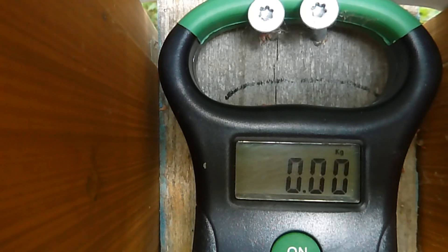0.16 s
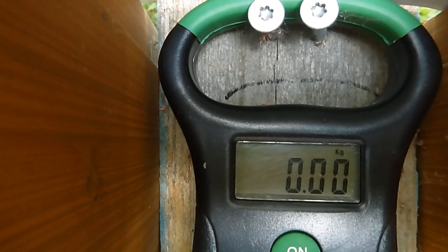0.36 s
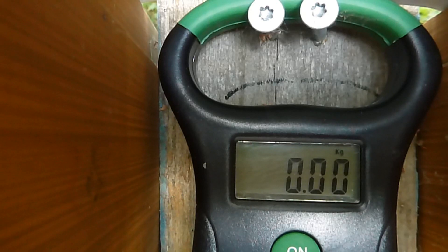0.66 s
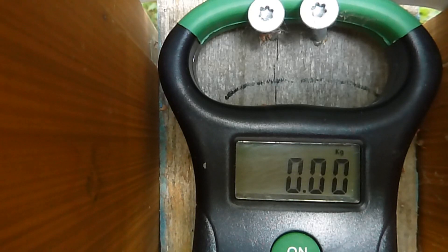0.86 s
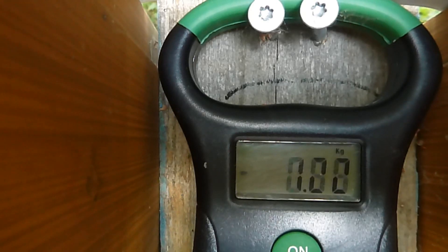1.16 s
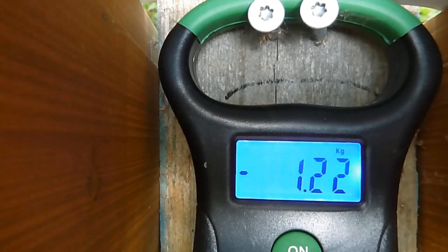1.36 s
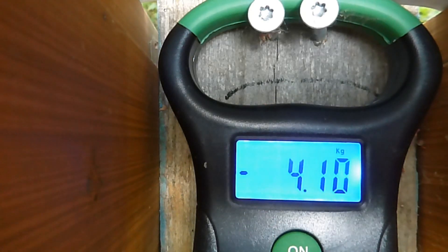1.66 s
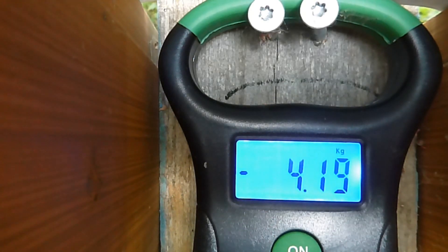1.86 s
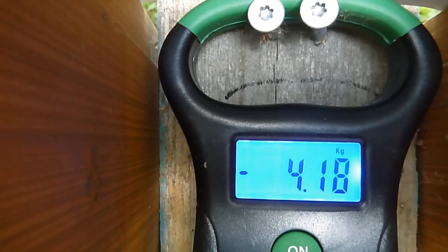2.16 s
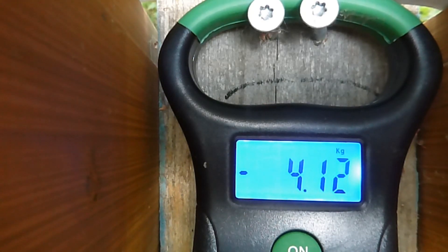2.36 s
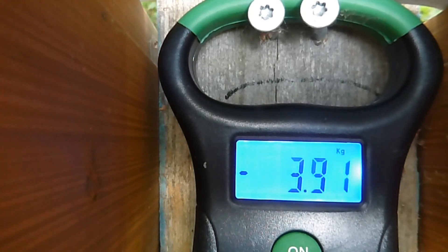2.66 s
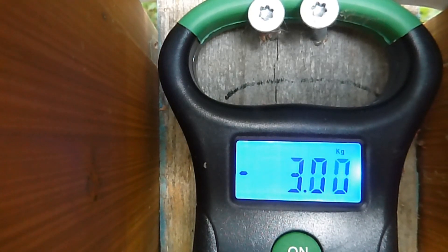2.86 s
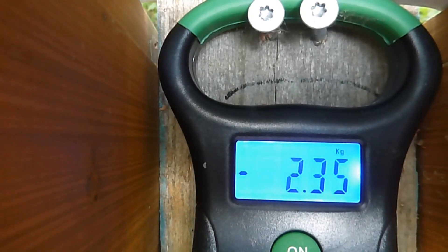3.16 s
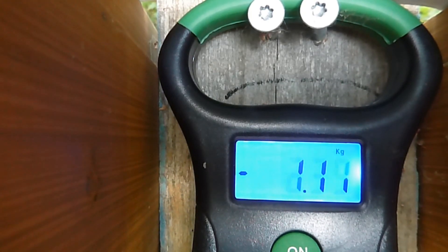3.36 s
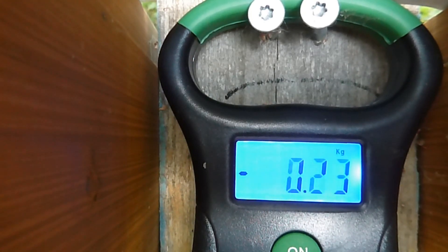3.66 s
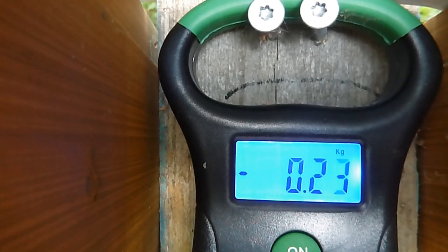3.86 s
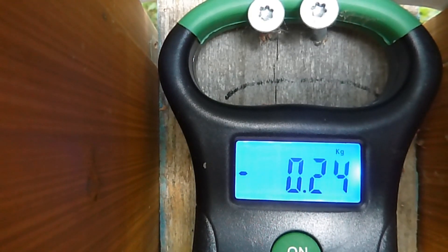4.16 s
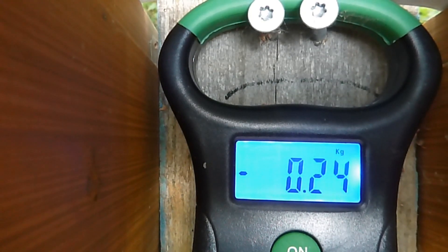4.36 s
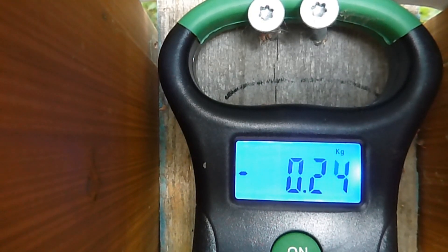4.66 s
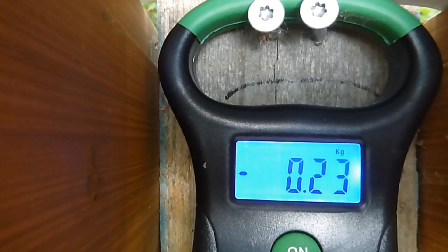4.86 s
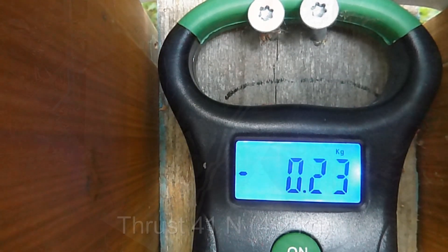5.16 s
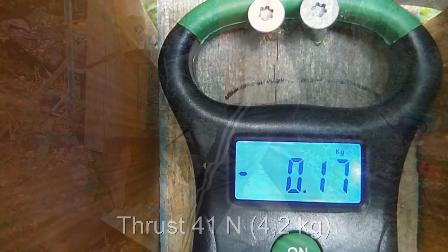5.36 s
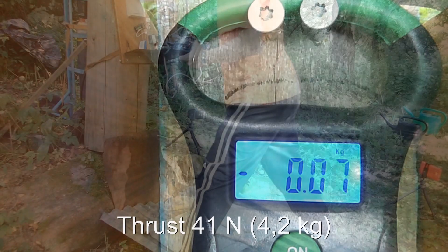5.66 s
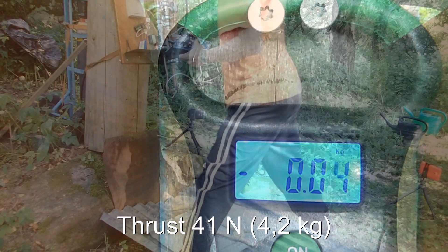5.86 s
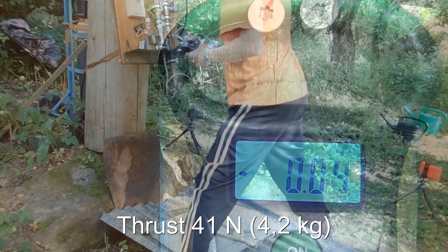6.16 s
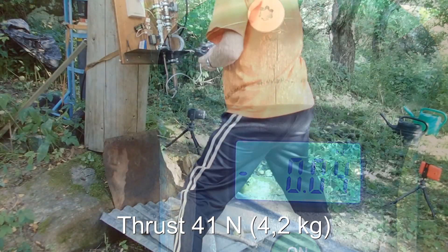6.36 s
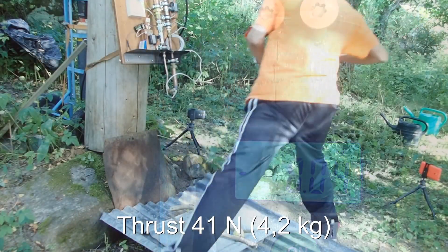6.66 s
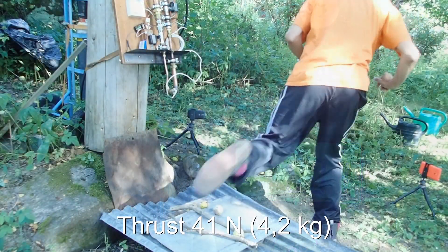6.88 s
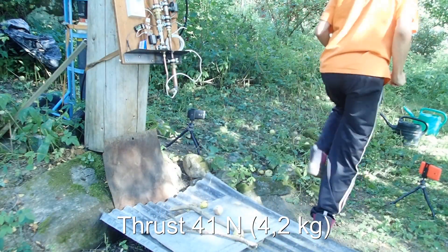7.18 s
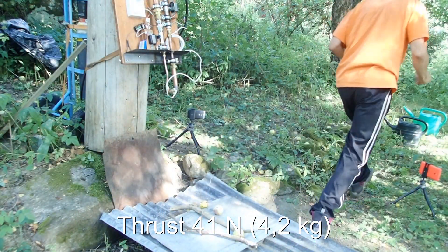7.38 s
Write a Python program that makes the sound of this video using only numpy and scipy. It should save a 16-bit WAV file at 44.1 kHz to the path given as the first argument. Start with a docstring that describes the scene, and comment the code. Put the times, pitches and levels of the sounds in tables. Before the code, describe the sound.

Outdoor test stand, microphone near the motor, dry sound. A full gritty roar sags slightly and breaks off in cracks; a fraying, jumping whistle and strong hiss follow, then gusty sputters and a throaty rush. Suddenly the level drops to airy hiss through a hollow tube, with a low blown-bottle hum that swells once. It cuts out with a flutter and gulp. Faint insects surround the listener, with a scrape underfoot and one hard step clanking thin metal.

```python
"""A small solid-fuel rocket motor burns close by on an outdoor stand, starting with a roar of shaped noise.
Slag pops (short pressure swings), a screech (gliding, fraying tones) joins, and the flame sputters in gusts.
Thrust then drops to a hollow hiss through case resonances, with a blown-bottle hum, and dies with a low gulp.
A quiet garden of high insect hiss and soft air (more noise) fades in, where someone runs off:
a scuff of gritty noise, then a hard footfall that sets off the ringing tones of a metal sheet."""
import sys
import numpy as np
from scipy import signal
from scipy.fft import rfft, irfft
from scipy.io import wavfile
from scipy.ndimage import uniform_filter1d

SR = 44100
rng = np.random.default_rng(int(sys.argv[2]) if len(sys.argv) > 2 else 0)


def output_pcm(signal):
    """Save a mono or channel-first signal as 16-bit PCM at the path in sys.argv[1].

    Samples are clipped to [-1, 1] before scaling.
    """
    pcm = np.clip(np.atleast_2d(signal).T, -1, 1) * 32767
    wavfile.write(sys.argv[1], SR, np.round(pcm).astype(np.int16))


N = 331587
TIME = np.arange(N) / SR  # seconds
HZ = np.fft.rfftfreq(N, 1 / SR)
# thrust collapses at burnout; the last fuel is gone at EMPTY_S
BURNOUT_S, COLLAPSE_S, EMPTY_S = 3.22, 0.019, 5.315


def amp(db):
    """Turns decibels into a gain."""
    return 10 ** (np.asarray(db) / 20)


def unit(x):
    """Scales a signal to rms 1."""
    return x / np.sqrt(np.mean(x ** 2) + 1e-20)


def colour(points):
    """Gain of a spectrum whose points are joined on a log-frequency axis."""
    hz, db = np.transpose(points)
    return amp(np.interp(np.log(HZ + 1), np.log(hz + 1), db))


def bumps(modes):
    """Gain of resonances (positive dB) or notches (negative dB) on a flat base."""
    return amp(sum(db / (1 + (2 * (HZ - hz) / width) ** 2) for hz, width, db in modes))


def peak(hz, width):
    """Gain of one resonance that lets only its own pitch region through."""
    return 1 / (1 + (2 * (HZ - hz) / width) ** 2)


def resonances(modes):
    """Gain of several separate resonances."""
    return sum(amp(db) * peak(hz, width) for hz, width, db in modes)


def wander(rate_hz):
    """Smooth random drift of rms 1, mostly slower than the given rate."""
    return unit(irfft(rfft(rng.standard_normal(N)) / (1 + (HZ / rate_hz) ** 4), N))


def turbulence(gain, band, width, gust_db=0, gust_hz=100):
    """Moving air: mid and side noise in gusts, then coloured; the mid has rms 1 inside the band."""
    gusts = amp(gust_db * wander(gust_hz))
    spectrum = rfft(rng.standard_normal((2, N)) * gusts) * gain
    spectrum[1] *= width
    inside = (HZ > band[0]) & (HZ < band[1])
    return irfft(spectrum, N) / np.std(irfft(spectrum[0] * inside, N))


def scatter(share, decay):
    """Gain of the direct path plus reflections; only short waves bounce off the stand's small parts."""
    spray = rng.standard_normal(N) * np.exp(-TIME / decay)
    short_waves = HZ ** 2 / (HZ ** 2 + 2500 ** 2)
    return abs(1 + share * short_waves * rfft(spray) / np.linalg.norm(spray))


def ahead(x, side_db):
    """Mid and side of a source in front, with a little scattered sound from the sides."""
    spray = rng.standard_normal(N) * np.exp(-TIME / 0.004)
    scattered = irfft(rfft(x) * rfft(spray), N) / np.linalg.norm(spray)
    return np.array([x, amp(side_db) * scattered])


def held(end, release):
    """Full until the end, then an exponential release."""
    return np.exp(-np.maximum(TIME - end, 0) / release)


def envelope(start, rise, end, release):
    """Straight attack, hold until the end, exponential release."""
    return np.clip((TIME - start) / rise, 0, 1) * held(end, release)


def burst(start, rise, decay):
    """An attack that starts to die away as soon as it is full."""
    return envelope(start, rise, start + rise, decay)


PUFF_RISE_S = 0.0051


def puffs(rows):
    """Gain over time of a series of short puffs of gas."""
    return sum(amp(db) * burst(s, PUFF_RISE_S, decay) for s, db, decay in rows)


# tone colour of the insect chorus: f/Hz, level/dB
INSECT_COLOUR = [(2500, -46), (3600, -22), (4600, -10), (6200, -3), (7700, -6.5), (9200, -4),
                 (10200, -15.5), (15000, -20)]
# tone colour of the outdoor air: f/Hz, level/dB
AIR_COLOUR = [(20, -5), (60, 1), (150, 1), (400, -1), (1000, -4.5), (1600, -7), (2200, -16.5),
              (3200, -20.5), (8000, -27)]
# how widely the garden spreads around the listener: f/Hz, side level/dB
GARDEN_SPREAD = [(30, 1), (300, -6), (1500, -6.5), (5000, -6.5), (10000, 2)]
GARDEN_START_S, GARDEN_RISE_S = 5.31, 1.57
INSECTS_DB, AIR_DB, AIR_EARLY_SHARE = -59.7, -63, 0.32  # the air is faintly there all along


def garden():
    """A far chorus of insects, blended into a steady hiss, over soft outdoor air."""
    width = colour(GARDEN_SPREAD)
    insects = turbulence(colour(INSECT_COLOUR), (5000, 9500), width, gust_db=0.0, gust_hz=60)
    air = turbulence(colour(AIR_COLOUR), (100, 1500), width, gust_db=-1.1, gust_hz=12)
    fade_in = np.clip((TIME - GARDEN_START_S) / GARDEN_RISE_S, 0, 1)
    air_strength = AIR_EARLY_SHARE + (1 - AIR_EARLY_SHARE) * fade_in
    return amp(INSECTS_DB) * insects * fade_in + amp(AIR_DB) * air * air_strength


# feet on dry ground: t/s, level/dB, rise/s, decay/s
STEPS = [(6.735, -49, 0.041, 0.052), (6.811, -51.5, .008, .018), (7.25, -53.5, .003, 0.2)]
# tone colour of grit and dry leaves underfoot: f/Hz, level/dB
GRIT_COLOUR = [(60, -16), (330, 6), (700, -1.5), (1300, 7.5), (1900, -2), (2600, -19), (6000, 2),
               (9000, -4), (11000, -18), (15000, -20)]


def footsteps():
    """Soles scrape over grit and dry leaves: rough noise that swells with each press of the foot."""
    press = sum(amp(db) * burst(s, rise, decay) for s, db, rise, decay in STEPS)
    return press * turbulence(colour(GRIT_COLOUR), (50, 15000), amp(-9), gust_db=-1.5, gust_hz=400)


# heel, sole and rebound knock the sheet: t/s, level/dB
SHEET_KNOCKS = [(7.2499, -42), (7.259, -49), (7.266, -50)]
# tone colour of the clatter: f/Hz, level/dB
CLATTER_COLOUR = [(100, -22.5), (450, -13), (800, 2), (1700, 5), (2100, -25), (5000, -34)]
# ringing tones of the metal sheet: f/Hz, level/dB, time to fall by 60 dB/s
SHEET_MODES = [(540, -61.5, .4), (804, -51, .07), (972, -53.5, 0.38), (1140, -53.5, 0.64), (1390, -58, .5),
               (1560, -47, 0.47), (1650, -55, 0.77)]


def sheet():
    """Heel and sole knock a metal sheet: a short clatter, then its wavering modes ring on."""
    clatter = turbulence(colour(CLATTER_COLOUR), (400, 2000), amp(-12))
    blows = sum(amp(db) * (TIME > s) * np.exp(-abs(TIME - s) / 0.005) for s, db in SHEET_KNOCKS)
    t = np.maximum(TIME - SHEET_KNOCKS[0][0], 0)
    ring = np.zeros(N)
    for hz, db, t60 in SHEET_MODES:
        phase = 2 * np.pi * hz * t + 0.777 * wander(52)
        ring += amp(db - 60 * t / t60) * np.sin(phase)
    return clatter * blows + ahead(ring * np.minimum(t / 0.0028, 1), side_db=-9.5)


# cancellations heard beside the stand, used for most motor sounds: f/Hz, width/Hz, level/dB
NOTCHES = [(1285, 39, -13), (1914, 60, -22), (2410, 160, -18)]
# tone colour of the guttering flame: f/Hz, level/dB
FLUTTER_COLOUR = [(30, -25), (100, -30), (160, -12), (260, -8), (380, -1), (520, -2.5), (800, -7.5),
                  (1100, -14), (2500, -26), (6000, -40)]
# the flame gutters as it goes out: t/s, level/dB, decay/s
GUTTERS = [(5.19, -42, 0.06), (5.295, -40.5, 0.089), (5.465, -65, 0.016)]
# resonances of the empty case: f/Hz, width/Hz, level/dB
SINGING_MODES = [(397, 43, 8.5), (647, 81, 1), (2000, 82, 3), (2140, 110, -2), (3490, 220, -7),
                 (5100, 120, -7), (8600, 200, -13), (13650, 220, -11), (14830, 250, -8)]
SINGING_SPELL, SINGING_DB = (5.25, 0.15, 5.6, 0.16), -61  # start, rise, end, release in s
LAST_GULP = (5.44, 0.022, 0.022)  # start, rise, decay in s
LAST_GULP_HZ, LAST_GULP_WIDTH_HZ, LAST_GULP_DB = 163, 50, -48.5


def flameout():
    """The flame flutters and goes out with a low gulp, and the last gas sings in the case."""
    flutter = turbulence(colour(FLUTTER_COLOUR), (100, 900), amp(-42), gust_db=1.5, gust_hz=80)
    gulp = turbulence(peak(LAST_GULP_HZ, LAST_GULP_WIDTH_HZ), (100, 300), amp(-24))
    case = resonances(SINGING_MODES) * bumps(NOTCHES)
    singing = turbulence(case, (200, 15500), amp(-29), gust_db=3.0, gust_hz=30)
    flutter = flutter * puffs(GUTTERS)
    gulp = amp(LAST_GULP_DB) * gulp * burst(*LAST_GULP)
    singing = amp(SINGING_DB) * singing * envelope(*SINGING_SPELL)
    return flutter + gulp + singing


HUM_HZ, HUM_WIDTH_HZ, HUM_DB, HUM_SIDE_DB = 374, 36.5, -46, -28
HUM_SPELL = (3.26, 0.26, 5.45, 0.04)  # start, rise, end, release in s
HUM_STEADY = 0.45  # 0 leaves the swells alone, higher evens them out
# one flare-up; its level is that of the extra hum, added to the hum already there
SURGE_S, SURGE_RISE_S, SURGE_DECAY_S, SURGE_EXTRA_DB = 4.4, 0.077, 0.15, 6.5


def hum():
    """The case sounds like a blown bottle; the oscillation partly steadies itself and flares up once."""
    air = turbulence(peak(HUM_HZ, HUM_WIDTH_HZ), (250, 500), amp(HUM_SIDE_DB))
    swell = abs(signal.hilbert(air[0]))
    air /= (swell + 0.3) ** HUM_STEADY
    surge = 1 + amp(SURGE_EXTRA_DB) * burst(SURGE_S, SURGE_RISE_S, SURGE_DECAY_S)
    return amp(HUM_DB) * air / np.std(air[0]) * envelope(*HUM_SPELL) * surge


GLOW_START, GLOW_STALL_S, GLOW_RECOVER_S = 0.38, 0.043, 0.073  # low share, time it stays low, recovery
GLOW_TOP_S, GLOW_ARCH_DB_PER_S2 = 4.62, 4.5


def glow():
    """How strongly the last fuel burns: it recovers after burnout, then follows one broad arch."""
    onset = np.clip((TIME - BURNOUT_S) / COLLAPSE_S, 0, 1)
    recovery = 1 - (1 - GLOW_START) * held(BURNOUT_S + GLOW_STALL_S, GLOW_RECOVER_S)
    arch = amp(-GLOW_ARCH_DB_PER_S2 * (TIME - GLOW_TOP_S) ** 2)
    return onset * recovery * arch


# tone colour of the soft hiss: f/Hz, level/dB
EMBER_HISS_COLOUR = [(1500, -39), (2500, -8.5), (2750, -10), (3450, -8.5), (4200, -16.5), (5000, -2.5),
                     (5550, -8), (6300, -3), (7600, -0.5), (9300, -4.5), (11500, -1), (13600, 2),
                     (14800, 2.5), (15700, -18)]
# tone colour of the hollow body sound: f/Hz, level/dB
EMBER_BODY_COLOUR = [(30, -23), (120, -15), (280, -1.5), (520, -2), (750, 5), (980, -4), (1500, 2),
                     (2200, 7), (2550, -7), (4000, -20)]
# resonances of the emptying case: f/Hz, width/Hz, level/dB
CASE_MODES = [(383, 36, 9), (1136, 45, 7.5), (1740, 41, 2.5), (2266, 79, 4), (3445, 84, 4), (5910, 57, 9.5),
              (6740, 66, 6), (12120, 40, 5), (12900, 44, 4), (13720, 95, -3), (14100, 130, 5)]
# tone colour of the last grains rasping in the nozzle: f/Hz, level/dB
RASP_COLOUR = [(1500, -2.5), (2500, 5.5), (3200, 9), (3500, 8), (4300, 0), (5500, -0.5), (7000, 1),
               (9000, -13), (15000, -11)]
EMBER_SIDE_DB = -19
# levels before the glow shapes them; releases once the fuel is gone
EMBER_HISS_DB, EMBER_HISS_RELEASE_S = -34.5, 0.036
EMBER_BODY_DB, EMBER_BODY_RELEASE_S = -36.5, 0.017
SEEP_DB, SEEP_DECAY_S = -17, 0.21  # share of the gas that seeps out afterwards
RASP_DB, RASP_RISE_S, RASP_END_S, RASP_RELEASE_S = -47, 0.014, 4.72, 0.27  # fades first


def embers():
    """With the pressure gone, gas blows softly through the hollow case and rasps in the nozzle."""
    notches, width = bumps(NOTCHES), amp(EMBER_SIDE_DB)
    case = bumps(CASE_MODES) * notches
    hiss_gain = colour(EMBER_HISS_COLOUR) * case * scatter(0.56, 0.021)
    hiss = turbulence(hiss_gain, (5000, 15000), width, gust_db=0.3, gust_hz=298.5)
    body = turbulence(colour(EMBER_BODY_COLOUR) * case, (250, 2300), width, gust_db=0.84, gust_hz=89)
    rasp_gain = colour(RASP_COLOUR) * notches * scatter(1.0, 0.021)
    rasp = turbulence(rasp_gain, (2500, 4000), width, gust_db=1.5, gust_hz=196)
    seep = amp(SEEP_DB) * held(EMPTY_S, SEEP_DECAY_S)
    hiss_end = held(EMPTY_S, EMBER_HISS_RELEASE_S)
    hiss *= amp(EMBER_HISS_DB) * np.maximum(hiss_end, amp(-4.5) * seep)
    body *= amp(EMBER_BODY_DB) * np.maximum(held(EMPTY_S, EMBER_BODY_RELEASE_S), seep)
    rasp *= amp(RASP_DB) * envelope(BURNOUT_S, RASP_RISE_S, RASP_END_S, RASP_RELEASE_S) * hiss_end
    return (hiss + body) * glow() + rasp


# slag passing the nozzle: t/s, level/dB, f/Hz, length/s
POPS = [(1.0938, -7, 640, 0.0028), (1.0962, -11, 995, 0.0012), (1.1007, -15.5, 700, 0.0022),
        (1.122, -19, 600, 0.0027), (1.2435, -10.5, 675, 0.0013), (2.039, -20, 713, 0.0016)]
# tone colour of the gas torn loose by a pop: f/Hz, level/dB
CRACK_COLOUR = [(30, -17), (90, 1), (160, -3.5), (400, 2), (1500, -4.5), (2300, -8), (4000, -24.5),
                (12000, -33)]
CRACK_DB, CRACK_RISE_S, CRACK_DECAY_S = -11.5, 0.001, 0.0056  # level relative to its pop


def pops():
    """Each lump of slag chokes the throat and is blown out: a short pressure swing and a crack of gas."""
    out = np.zeros(N)
    gas = unit(irfft(rfft(rng.standard_normal(N)) * colour(CRACK_COLOUR), N))
    for s, db, hz, length in POPS:
        t = TIME - s
        swing = np.exp(-(t / length) ** 2) * np.sin(2 * np.pi * hz * t)
        crack = amp(CRACK_DB) * gas * burst(s - length, CRACK_RISE_S, CRACK_DECAY_S)
        out += amp(db) * (swing + crack)
    return out


# each state that the jet's shock cells lock into:
# start t/s, f/Hz, glide/(Hz per s), level/dB, roughness 0-1
SCREECH_STATES = [(1.222, 4044, -500, -34, 0.37), (1.322, 3890, 350, -29, 0.2), (1.465, 3780, 0, -30, 0.4),
                  (1.533, 3790, -3, -33, 0.4), (1.585, 3776, 1.5, -29, 0.25),
                  (1.664, 3765, -350, -30, 0.42), (1.788, 3630, 348.5, -30, 0.85),
                  (2.081, 3725, -1.5, -29, 0.12), (2.17, 3690, 701, -32, 0.54)]
# strength of harmonics 1 to 4: level/dB
SCREECH_PARTIALS_DB = [-2.5, -8.5, -8.5, -14.5]
SCREECH_END_S, SCREECH_RISE_S, SCREECH_RELEASE_S, SCREECH_SIDE_DB = 2.235, 0.024, 0.019, -22


def screech():
    """Feedback between shock cells and nozzle lip: a whistle that jumps, and frays as it loses lock."""
    starts = np.transpose(SCREECH_STATES)[0]
    state = np.maximum(np.searchsorted(starts, TIME) - 1, 0)
    since, hz, glide, level_db, rough = np.array(SCREECH_STATES)[state].T
    rough = np.clip(rough, 0, 1)
    pitch = hz + glide * (np.minimum(TIME, SCREECH_END_S) - since)
    pitch += 6 * wander(55) + 95 * rough * wander(490)  # unsteadiness in Hz
    phase = 2 * np.pi * np.cumsum(pitch) / SR
    tone = np.zeros(N)
    for k, db in enumerate(SCREECH_PARTIALS_DB, 1):
        fray = (wander(190) + 1j * wander(190)) / np.sqrt(2)
        loop = np.sqrt(1 - rough ** 2) + rough * fray
        loop /= np.sqrt(1 + abs(loop) ** 2)  # the feedback saturates
        tone += amp(db + 2.7 * wander(90)) * (loop * np.exp(1j * k * phase)).real
    strength = amp(uniform_filter1d(level_db, size=600))  # softens the jumps in level
    strength *= envelope(starts[0], SCREECH_RISE_S, SCREECH_END_S, SCREECH_RELEASE_S)
    return unit(tone * amp(1.0 * wander(80))) * strength


# single coughs before and after the ragged spell: t/s, level/dB, decay/s
COUGHS = [(2.128, -32, 0.016), (2.154, -32, 0.023), (2.197, -26, 0.012), (2.688, -31.5, 0.04),
          (2.79, -34.5, 0.03), (3.203, -31.5, 0.016)]
SPUTTER_SPELL = (2.204, 0.056, 2.585, 0.0094)  # start, rise, end, release in s
SPUTTER_START_DB, SPUTTER_GROWTH_DB_PER_S = -28, 8
MUTTER_DB, MUTTER_DECAY_S = -37, 0.24


def sputtering():
    """Strength of the ragged burning: a growing spell, a mutter that outlasts it, and single coughs."""
    start, rise, end, _ = SPUTTER_SPELL
    growth = amp(SPUTTER_START_DB + SPUTTER_GROWTH_DB_PER_S * (TIME - start))
    spell = growth * envelope(*SPUTTER_SPELL)
    mutter = amp(MUTTER_DB) * envelope(start, rise, end, MUTTER_DECAY_S)
    return spell + mutter + puffs(COUGHS)


# tone colour of the nozzle hiss: f/Hz, level/dB
HISS_COLOUR = [(40, -19.5), (150, -2.5), (400, 1), (780, 10), (1000, 2.5), (1250, 6.5), (1650, 12),
               (2150, 13), (2700, 5), (4300, 2), (7500, -1.5), (10000, -3), (14000, 4), (15500, -3.5)]
# strength of the jet's fine turbulence, before HISS_TRIM_DB: t/s, level/dB
JET_LEVEL = [(0.0, -47), (0.01, -56.5), (0.42, -47), (0.49, -43.5), (1.17, -39.5), (1.42, -44),
             (2.39, -43.5), (3.07, -44), (3.2, -42)]
# tone colour of the flame's roar: f/Hz, level/dB
FLAME_COLOUR = [(30, -47), (90, -23.5), (130, -17.5), (200, -11), (350, 1.5), (600, 1), (1150, -0.5),
                (1700, -4.5), (2200, -2.5), (2800, -12.5), (4300, -25), (5200, -21), (8000, -29.5),
                (15000, -42.5)]
# resonances in the roar: f/Hz, width/Hz, level/dB
FLAME_MODES = [(351, 110, 1.5), (630, 22, 10), (887, 44, 11), (1182, 69, 11.5), (1470, 90, 6.5),
               (1760, 100, 6)]
# two narrow noise bands and one broad one, from the nozzle throat, riding on the roar:
# f/Hz, width/Hz, level/dB
THROAT_BANDS = [(3210, 50, -4), (3440, 55, -0.5), (5040, 700, -13.5)]
# tone colour of the ragged burning: f/Hz, level/dB
SPUTTER_COLOUR = [(25, -30), (90, -2), (200, -4.5), (400, 6.5), (760, 10), (1050, 0), (1500, 3),
                  (2200, -12), (4000, -39.5), (10000, -51)]
# tone colour of the throaty rush: f/Hz, level/dB
RUSH_COLOUR = [(60, -54), (300, -16), (750, -2), (1100, -6.5), (1500, -3), (2150, 2.5), (2800, -7.5),
               (4000, -14), (8000, -12)]
# how widely the close jet spreads: f/Hz, side level/dB
JET_SPREAD = [(30, -19), (200, -20), (700, -23), (1300, -23), (2400, -20.5), (4400, -18), (8000, -16.5),
              (14000, -18.5)]
HISS_TRIM_DB, STAND_SHARE = -1.25, 0.42  # the share of the hiss that bounces off the stand
ROAR_NARROWER_DB = -8  # all but the hiss spread less
# the roar sags ever faster as pressure builds, and ends when the nozzle runs clean
FLAME_DB, FLAME_SAG_DB, FLAME_SAG_POWER, FLAME_END_S, FLAME_RELEASE_S = -21, 13.5, 3.86, 1.135, 0.028
# as thrust sags, slower eddies add a throaty rush until burnout
RUSH_START_S, RUSH_RISE_S, RUSH_DB = 2.685, 0.015, -36


def jet():
    """The roar ends early, sputtering comes and goes, and the hiss and late rush die away at burnout."""
    notches, width = bumps(NOTCHES), colour(JET_SPREAD)
    hiss_gain = colour(HISS_COLOUR) * notches * scatter(STAND_SHARE, 0.0013)
    hiss = turbulence(hiss_gain, (8500, 10500), width, gust_db=0.57, gust_hz=250)
    width = width * amp(ROAR_NARROWER_DB)
    flame_gain = colour(FLAME_COLOUR) * bumps(FLAME_MODES) * notches * scatter(0.55, 0.0095)
    flame = turbulence(flame_gain, (300, 1500), width, gust_db=1.47, gust_hz=160)
    throat = turbulence(resonances(THROAT_BANDS), (3000, 6000), width, gust_db=2.0, gust_hz=60)
    flame += amp(-17.5) * throat
    sputter = turbulence(colour(SPUTTER_COLOUR) * notches, (250, 1000), width, gust_db=1.5, gust_hz=200)
    rush = turbulence(colour(RUSH_COLOUR) * notches, (500, 2500), width, gust_db=0.6, gust_hz=120)
    hiss *= amp(np.interp(TIME, *np.transpose(JET_LEVEL)) + HISS_TRIM_DB)
    sag_db = FLAME_SAG_DB * np.minimum(TIME / FLAME_END_S, 1) ** FLAME_SAG_POWER
    flame *= amp(FLAME_DB - sag_db) * held(FLAME_END_S, FLAME_RELEASE_S)
    rush *= amp(RUSH_DB) * np.clip((TIME - RUSH_START_S) / RUSH_RISE_S, 0, 1)
    together = hiss + flame + sputter * sputtering() + rush
    return together * held(BURNOUT_S, COLLAPSE_S) * amp(0.44 * wander(15))


def scene():
    """The motor lies ahead, the garden all around; late on, everything leans slightly left."""
    whistle = ahead(screech(), side_db=SCREECH_SIDE_DB)
    slag = ahead(pops(), side_db=-26.5)
    motor = flameout() + hum() + embers() + slag + whistle + jet()
    mid, side = garden() + footsteps() + sheet() + motor
    lean = amp(np.interp(TIME, [5.4, 6.8], [0, 0.45]))
    return np.array([(mid + side) * lean, (mid - side) / lean])


EDGE_HZ = 15750


def record(dry):
    """Band limit: a steep low-pass filter removes the treble above the edge."""
    low_pass = signal.firwin(511, EDGE_HZ, window=("kaiser", 9), fs=SR)
    return signal.oaconvolve(dry, low_pass[None], "same", axes=1)


dry = scene()
out = record(dry)
output_pcm(out)
```